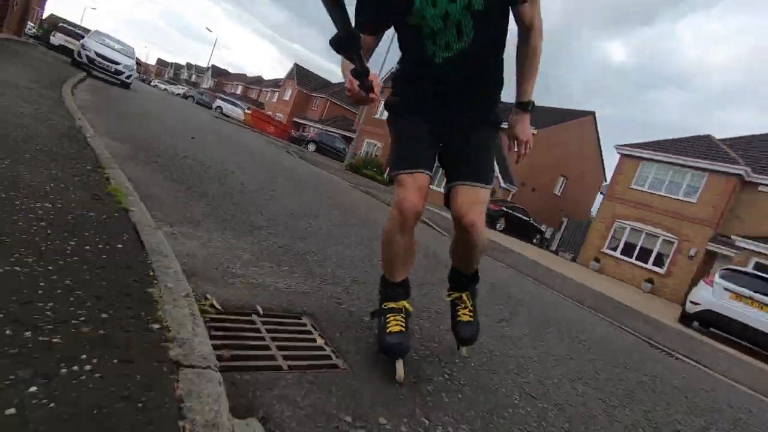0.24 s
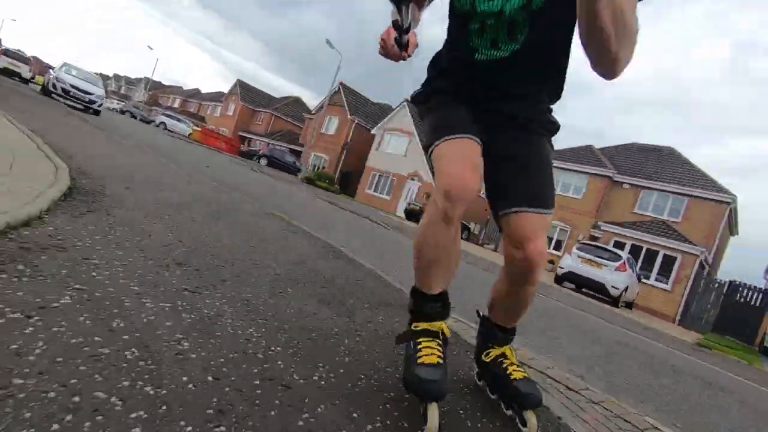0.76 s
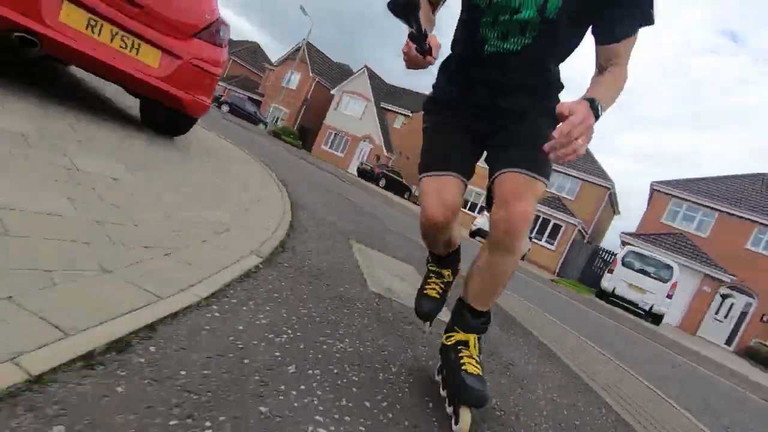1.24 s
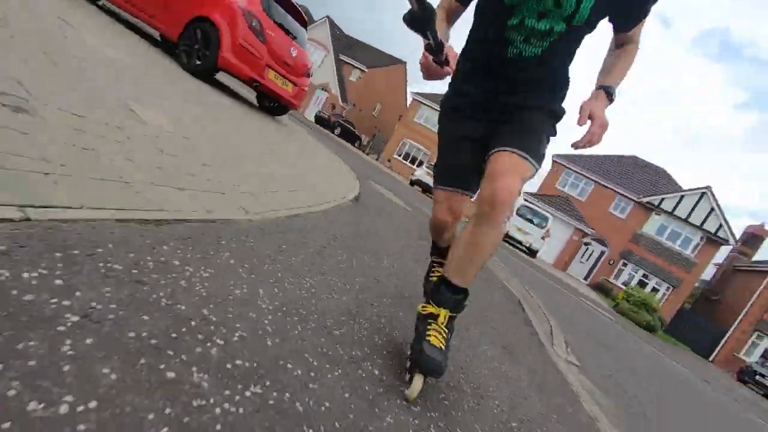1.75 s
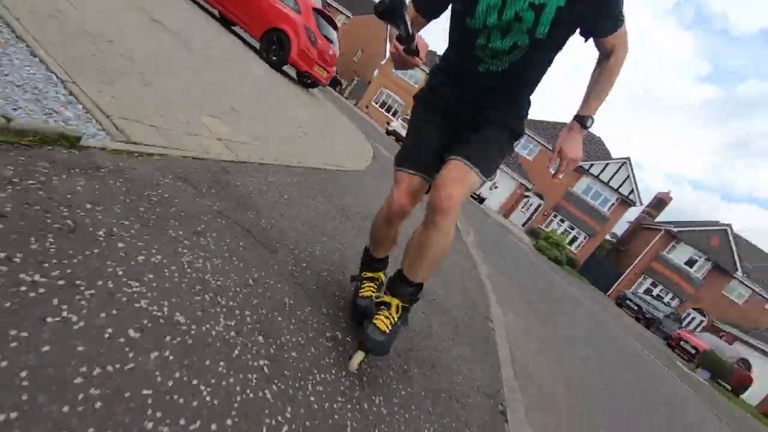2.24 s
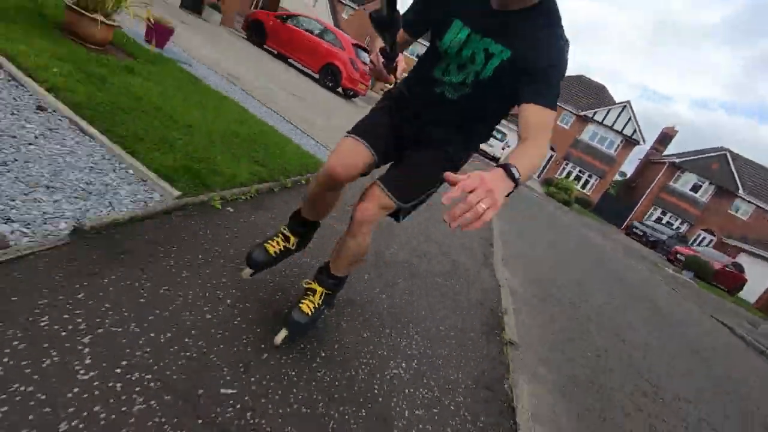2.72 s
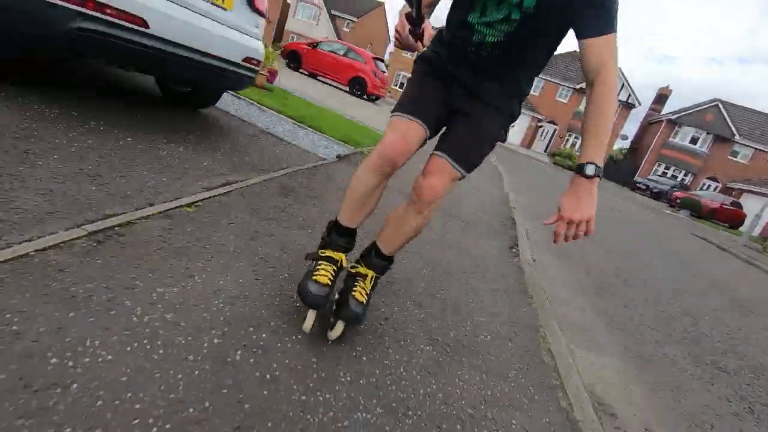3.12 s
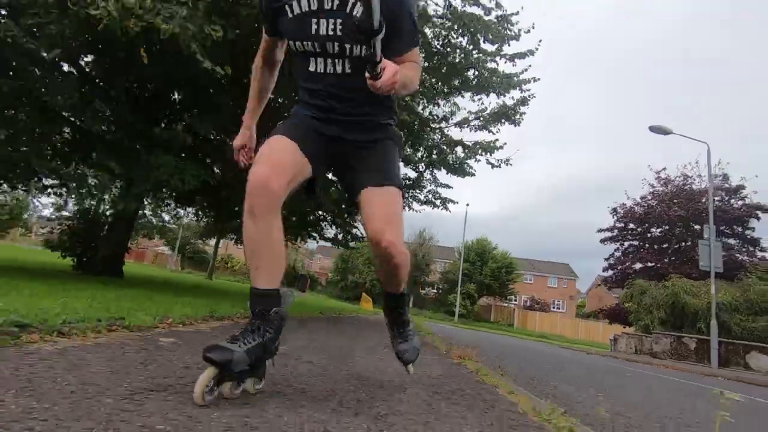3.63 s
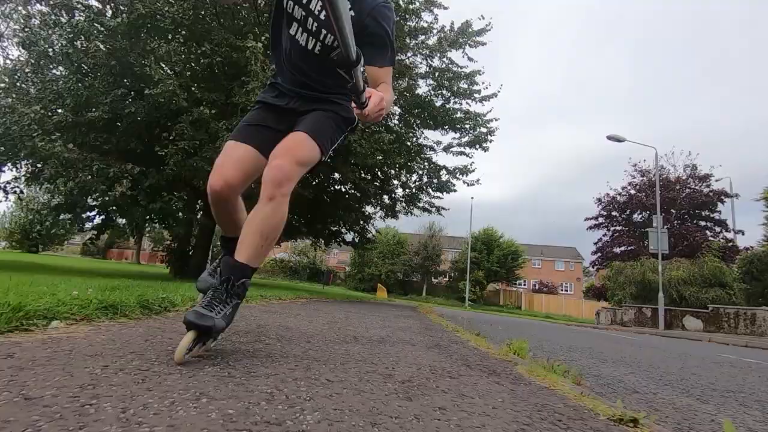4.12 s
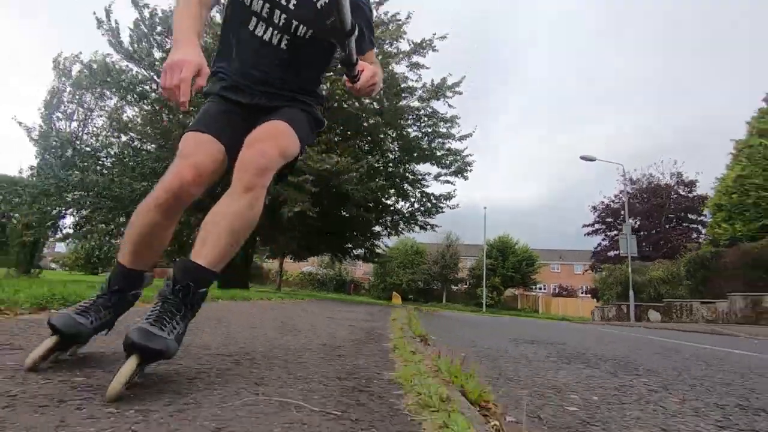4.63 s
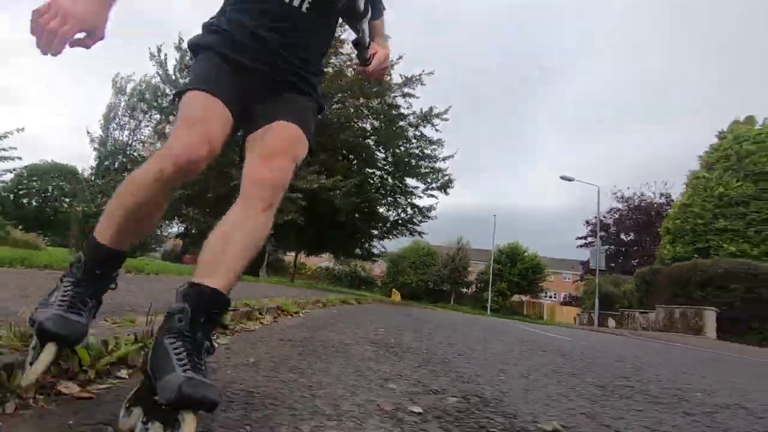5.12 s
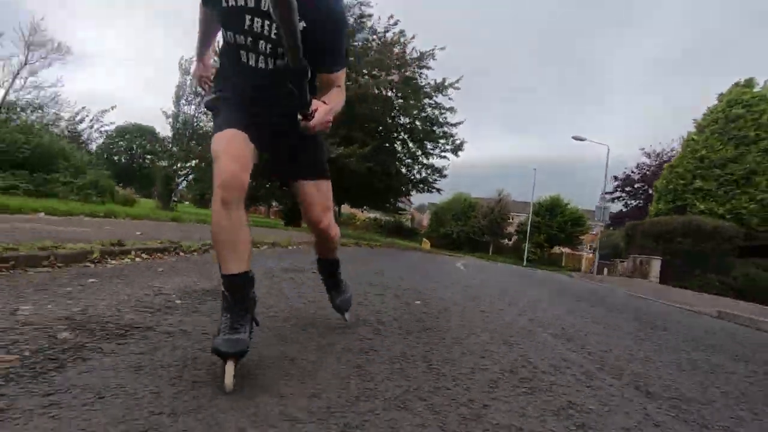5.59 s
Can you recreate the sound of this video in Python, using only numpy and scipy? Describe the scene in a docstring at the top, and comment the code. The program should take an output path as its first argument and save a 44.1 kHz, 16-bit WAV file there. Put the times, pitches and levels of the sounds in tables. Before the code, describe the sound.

Inline skates roll over rough asphalt with a gritty roar and sharp knocks, while wind buffets the microphone.

```python
"""Inline skates roll over two stretches of rough asphalt, heard from a small camera held low on a pole.
Stones under the wheels give a gritty roar that comes in swells and rings in wheels and frames.
The wheels knock on cracks and landings, and the road reflects their sound up to the camera.
Right at the microphone, wind buffets the port and bursts into short puffs; jolts rumble up the pole."""
import sys
import numpy as np
from scipy import signal
from scipy.fft import rfft, irfft
from scipy.io import wavfile

SR = 44100
rng = np.random.default_rng(int(sys.argv[2]) if len(sys.argv) > 2 else 0)


def pcm_store(signal):
    """Save signal as 16-bit PCM."""
    levels = np.round(np.clip(np.atleast_2d(signal), -1, 1) * 32767)
    wavfile.write(sys.argv[1], SR, levels.astype(np.int16).T)


N = 258426
TIME_S = np.arange(N) / SR
CUT_S = 3.335   # the sound cuts abruptly from one stretch to the next


def from_db(db):
    """Decibels to gain."""
    return 10 ** (np.asarray(db) / 20)


def power_sum(levels_db):
    """Combined level in dB of unrelated sounds."""
    return 10 * np.log10(sum(10 ** (np.maximum(db, -150) / 10) for db in levels_db))


def rms_one(x):
    """Scale to rms 1."""
    return x / np.sqrt(np.mean(x ** 2) + 1e-20)


def rms_one_under(x, swell):
    """Scale to rms 1 under the swell."""
    return x * np.linalg.norm(swell) / np.linalg.norm(x * swell)


def curves(rows):
    """One curve for each column after the time, joined by straight lines."""
    times, *columns = np.transpose(rows)
    return [np.interp(TIME_S, times, column) for column in columns]


def drift(rate_hz):
    """Random wander of rms 1, smoothed above rate_hz."""
    r = np.exp(-2 * np.pi * rate_hz / SR)
    return rms_one(signal.lfilter([1], [1, -2 * r, r * r], rng.standard_normal(N + SR))[SR:])


def band(x, low_hz, high_hz, order=3):
    """Butterworth band-pass."""
    return signal.sosfilt(signal.butter(order, [low_hz, high_hz], "band", fs=SR, output="sos"), x)


def split(x, hz):
    """The parts below and above hz."""
    return [signal.sosfilt(signal.butter(4, hz, side, fs=SR, output="sos"), x)
            for side in ("low", "high")]


def colour(x, spectrum, size=8192):
    """Minimum-phase filter with a spectrum of (frequency_hz, level_db) points."""
    hz, db = np.transpose(spectrum)
    grid_hz = np.maximum(np.arange(size // 2 + 1) * SR / size, 1)
    cepstrum = irfft(np.interp(np.log(grid_hz), np.log(hz), db) * np.log(10) / 20)
    cepstrum[1:size // 2] *= 2
    cepstrum[size // 2 + 1:] = 0
    return signal.fftconvolve(x, irfft(np.exp(rfft(cepstrum))))[:len(x)]


def resonance(hz, width_hz):
    """Coefficients of a two-pole resonance with peak gain 1."""
    r = np.exp(-np.pi * width_hz / SR)
    return (1 - r * r) / 2 * np.array([1, 0, -1]), [1, -2 * r * np.cos(2 * np.pi * hz / SR), r * r]


def glide(x, pitch_hz, width_hz, size=256):
    """A resonance that follows a pitch curve in short blocks."""
    out, state = np.zeros(N), np.zeros(2)
    for i in range(0, N, size):
        tuning = resonance(pitch_hz[i], width_hz)
        out[i:i + size], state = signal.lfilter(*tuning, x[i:i + size], zi=state)
    return out


# Spectrum of the wind on the microphone port: frequency_hz, level_db
BUFFET_SPECTRUM = [(13, -25), (22, 5.5), (48, 1.5), (96, 2), (146, -1), (174, -9.5), (300, -30.5),
                   (390, -61.5), (660, -120)]
# Gusts at the port, 9 dB down a half length from the peak: peak_s, level_db, half_length_s
GUSTS = [(0.0, -21, 0.079), (0.374, -19, 0.019), (0.783, -35, 0.04), (0.92, -19.5, 0.016),
         (1.098, -18, 0.041), (1.7, -21.5, 0.058), (1.932, -22, 0.037), (2.212, -24, 0.018),
         (2.289, -17, 0.03), (2.518, -35, 0.0077), (2.669, -24, 0.092), (2.836, -24.5, 0.029),
         (2.978, -15.5, 0.072), (3.238, -20.5, 0.056), (3.374, -22.5, 0.049), (3.507, -19.5, 0.021),
         (3.649, -22, 0.017), (3.82, -17, 0.021), (4.047, -11.5, 0.01), (4.116, -28.5, 0.059),
         (4.236, -17.5, 0.03), (4.4, -29, 0.058), (4.517, -25.5, 0.13), (5.335, -34, 0.048),
         (5.5, -19.5, 0.077)]
# The deepest buffet against the rest: time_s, gain_db
DEEP_BUFFET = [(0.0, -4), (0.3, -0.5), (0.9, -12), (1.5, 1.5), (2.0, 1), (2.28, -6), (2.6, 5.5),
               (3.0, -3.5), (3.6, -1.5), (4.2, 4.5), (4.8, -8), (5.3, 0.5), (5.86, -3)]

def buffet(steady_db, lumps, deep_gust_share=0.18):
    """Eddies and gusts press on the port; the deepest part follows the gusts only a little."""
    gusts_db = [db - 9 * ((TIME_S - peak_s) / half_s) ** 2 for peak_s, db, half_s in GUSTS]
    level_db = power_sum([steady_db] + gusts_db)
    deep, upper = split(rms_one(colour(rng.standard_normal(N), BUFFET_SPECTRUM)), hz=55.6)
    deep_db = curves(DEEP_BUFFET)[0] - (1 - deep_gust_share) * (level_db - steady_db) + 2.5 * drift(2.8)
    return from_db(level_db) * (upper * from_db(2.5 * lumps) + deep * from_db(deep_db))


# Jolts that reach the camera through the pole: peak_s, level_db
JOLTS = [(0.634, -19.5), (0.665, -25), (0.85, -38), (1.083, -20.5), (1.433, -28.5), (1.73, -32),
         (1.929, -26.5), (2.147, -24), (2.29, -24), (2.905, -13), (3.277, -23), (3.33, -24), (3.592, -31),
         (3.948, -23), (4.02, -38), (5.05, -17), (5.085, -16.5), (5.135, -18), (5.164, -12.5), (5.2, -20),
         (5.28, -17.5), (5.37, -21)]

def pole_rumble(steady_db, lumps, band_hz=(114.7, 308), rise_db_per_s=505, fall_db_per_s=415):
    """Wind and jolts make a low rumble that rings in the pole."""
    jolts_db = [db - np.maximum(rise_db_per_s * (peak_s - TIME_S), fall_db_per_s * (TIME_S - peak_s))
                for peak_s, db in JOLTS]
    shake = band(rng.standard_normal(N), *band_hz, order=2)
    pole = signal.lfilter(*resonance(hz=179.6, width_hz=62), shake)
    rumble = rms_one(band(rng.standard_normal(N), *band_hz)) + rms_one(pole)
    return from_db(power_sum([steady_db] + jolts_db)) * rms_one(rumble * from_db(2 * lumps))


# Steady wind at the microphone: time_s, buffet_db, rumble_db, flutter_db
WIND_LEVELS = [(0.0, -18, -25.5, -30.5), (0.35, -29.5, -32, -46.5), (0.47, -30.5, -41, -47.5),
               (0.575, -44.5, -66, -71), (0.66, -25, -27, -46.5), (0.93, -29, -30.5, -38.5),
               (1.2, -35, -37.5, -51.5), (1.5, -31.5, -40, -41.5), (1.82, -32, -40, -52.5),
               (2.09, -30, -41, -44.5), (2.53, -32, -43, -54), (2.7, -35.5, -37.5, -45),
               (2.87, -24, -34, -52.5), (2.94, -21.5, -27.5, -38), (3.03, -26, -28, -44),
               (3.09, -26, -26, -27), (3.15, -27, -28, -27.5), (3.23, -26, -30, -35.5),
               (3.33, -23.5, -35, -44.5), (3.57, -32.5, -41.5, -51.5), (3.7, -30, -36, -48.5),
               (3.95, -32, -28.5, -33.5), (4.1, -32.5, -39, -40.5), (4.35, -34.5, -34, -45),
               (4.77, -30.5, -34, -42.5), (4.9, -32.5, -31, -35.5), (5.0, -31.5, -22, -30.5),
               (5.11, -34, -27, -29.5), (5.17, -34, -25, -28), (5.25, -28, -32, -38),
               (5.33, -27.5, -29, -40), (5.46, -30, -28, -31), (5.68, -31.5, -32, -38),
               (5.86, -31.5, -38.5, -44)]

def wind(flutter_hz=(289, 712)):
    """Eddies pass the port in lumps that move buffet, rumble and a weak flutter together."""
    buffet_db, rumble_db, flutter_db = curves(WIND_LEVELS)
    lumps = 2 * np.tanh(drift(25.5) / 2)   # no single eddy towers over the rest
    low_wind = buffet(buffet_db, lumps) + pole_rumble(rumble_db, lumps)
    flutter = band(rng.standard_normal(N), *flutter_hz) * from_db(3 * lumps)
    return low_wind + from_db(flutter_db) * rms_one(flutter)


# Puffs right on the port: start_s, level_db, half_length_s, edge_gain_db, pitch_hz, edge_top_hz
PUFFS = [(0.624, -22, 0.0092, -8, 250, 1520), (0.849, -19, 0.01, -9, 300, 1500),
         (1.081, -30, 0.032, -2, 300, 1520), (1.936, -21.5, 0.0068, 1.5, 358, 1020),
         (2.889, -10, 0.015, -27, 306, 2290), (2.914, -12, 0.006, -23, 346, 2390),
         (2.948, -26, 0.027, -16, 300, 1900), (2.963, -28, 0.005, -1, 400, 3290),
         (2.987, -13.5, 0.016, -15, 350, 1350), (3.038, -29, 0.0061, -31, 395, 900),
         (3.062, -9, 0.013, -15, 364, 1600), (3.077, -21, 0.0074, -14, 400, 3000),
         (3.099, -22.5, 0.018, 3, 443, 1290), (3.126, -21.5, 0.011, -3, 450, 1912),
         (3.146, -38, 0.027, -17, 490, 900), (3.199, -20.5, 0.016, -9, 397, 1480),
         (3.235, -17.5, 0.02, -5.5, 300, 1040), (3.251, -32, 0.016, 8, 300, 2140),
         (3.27, -34, 0.0067, 8.5, 300, 1700), (3.801, -20, 0.015, -25, 250, 920),
         (3.82, -17.5, 0.014, -17, 397, 1200), (3.892, -14, 0.0073, -5, 393, 1300),
         (3.912, -15, 0.0068, -19, 396, 1200), (3.918, -21, 0.0085, -18, 543, 1200),
         (3.931, -17, 0.015, -25, 250, 900), (3.949, -23, 0.11, -4, 347, 1210),
         (4.034, -18, 0.0083, -25, 348, 890)]

def wind_puffs(gain_db=-7, pitch_spread=1.5, edge_from_hz=600, edge_thins_hz=1400):
    """A puff swells and fades quickly and unevenly; its bright edge shows only at the crest."""
    out, size = np.zeros(N), SR // 10
    for start_s, db, half_s, edge_db, hz, top_hz in PUFFS:
        air = rng.standard_normal(2 * size)
        swell = np.sin(np.pi * np.minimum(np.arange(size) / SR / (2 * half_s), 1)) ** 2
        body = band(air, hz / pitch_spread, hz * pitch_spread, order=1)
        body = rms_one_under(split(body, top_hz)[0][size:], swell)
        edge = band(air, 300, edge_thins_hz, order=1)
        edge = rms_one_under(band(edge, edge_from_hz, top_hz, order=2)[size:], swell ** 2)
        i = round(start_s * SR)
        out[i:i + size] += from_db(db + gain_db) * swell * (body + from_db(edge_db) * swell * edge)
    return split(out * from_db(2.5 * drift(85)), hz=3000)[0]


# Brief pitched rings in the roll and the wind: start_s, level_db, pitch_hz, length_s
RINGS = [(1.855, -39.5, 840, 0.015), (2.138, -29, 900, 0.012), (2.329, -42.5, 1330, 0.019),
         (2.448, -44, 2260, 0.056), (3.26, -32, 866, 0.02), (3.267, -36.5, 1570, 0.021),
         (3.283, -38, 1330, 0.014), (3.284, -50, 2330, 0.016), (3.649, -38, 2560, 0.041),
         (3.685, -37, 2190, 0.02), (3.971, -34, 1150, 0.029), (4.026, -27.5, 392, 0.035),
         (4.039, -33, 3070, 0.017)]

def brief_rings(width_hz=150):
    """Noise swells for a moment in one narrow resonance."""
    out, size = np.zeros(N), SR // 10
    for start_s, db, hz, length_s in RINGS:
        swell = np.sin(np.pi * np.minimum(np.arange(size) / SR / length_s, 1))
        narrow = resonance(hz, width_hz)
        ring = signal.lfilter(*narrow, signal.lfilter(*narrow, rng.standard_normal(2 * size)))
        i = round(start_s * SR)
        out[i:i + size] += from_db(db) * swell * rms_one_under(ring[size:], swell)
    return out


# Delay of the bounce off the road just below the microphone: time_s, lag_ms
GROUND_LAG = [(0.0, 1.4), (0.6, 1.24), (0.9, 0.78), (1.2, 0.68), (1.6, 1.18), (2.0, 0.88), (2.5, 0.73),
              (3.0, 0.93), (3.5, 0.66), (3.85, 1.3), (4.3, 0.73), (4.9, 1.06), (5.2, 1.2), (5.55, 0.96),
              (5.86, 0.76)]

def with_road_reflection(direct, reflection_db=-19.5):
    """The road reflects the wheels; the lag slides as skates and pole swing."""
    lag_s = curves(GROUND_LAG)[0] / 1000
    return direct + from_db(reflection_db) * np.interp(TIME_S - lag_s, TIME_S, direct)


def on_road(x, *spectra):
    """Wheel sound takes the colour of each stretch, at unit power gain; it switches at the cut."""
    pulse = np.eye(1, 4096)[0]
    first, second = (colour(x, s) / np.linalg.norm(colour(pulse, s)) for s in spectra)
    return np.where(TIME_S < CUT_S, first, second)


# Wheel tread on each stretch of asphalt: frequency_hz, level_db
FIRST_TREAD = [(820, -44), (1400, 7), (1670, 6), (2280, 2), (2860, 1), (3520, -1.5), (4400, -6.5),
               (4880, -8), (5250, -13.5), (5600, -18), (7280, -76.5), (12300, -120)]
SECOND_TREAD = [(820, -57.5), (1350, 1), (1520, 1), (1810, 5.5), (2050, 3), (2760, -1), (3380, -6),
                (3860, -8), (4800, -13.5), (5600, -25.5), (7280, -88), (12300, -120)]

def tread_tone(x):
    """The midrange colour of wheels on asphalt."""
    return on_road(x, FIRST_TREAD, SECOND_TREAD)


# Fine grit on each stretch, heard through the microphone port: frequency_hz, level_db
FIRST_GRIT = [(4500, -12), (5600, -1.5), (6300, -3), (7200, 0.5), (8300, -5), (9100, -17.5), (9700, -16),
              (10500, -12), (11500, -18.5), (13000, -24), (15500, -22)]
SECOND_GRIT = [(4500, -8), (5600, 0), (6300, -2), (7200, 2.5), (8300, -5.5), (9100, -16.5), (10000, -21),
               (10400, -21), (10850, -18), (11400, -25), (13000, -28), (15500, -58)]

def grit_tone(x):
    """The treble colour of grit, shaped by the port."""
    return on_road(x, FIRST_GRIT, SECOND_GRIT)


# Resonances of the skate boot: pitch_hz, width_hz, gain_db
BOOT_MODES = [(285, 91, 3), (630, 107, -3), (836, 27, -4), (1200, 67, -25)]

def boot_thud(thud, ring_db=13, thud_db=10, thud_hz=(196, 1590)):
    """A low thud and the ring it sets off in the boot."""
    ring = sum(from_db(db) * signal.lfilter(*resonance(hz, width_hz), thud)
               for hz, width_hz, db in BOOT_MODES)
    return from_db(ring_db) * split(ring, hz=1780)[0] + from_db(thud_db) * band(thud, *thud_hz)


# Cracks and stones in the road: start_s, level_db, thud_gain_db, tick_gain_db
CRACKS = [(0.119, -22, -14, -30), (0.16, -17, -2.5, -18), (0.204, -24.5, -8, -24), (0.243, -31, -12, -22),
          (0.3585, -19.5, -12, -24), (0.434, -26.5, -3, -24), (0.453, -26, -5, -23), (0.411, -25, -8, -23),
          (0.53, -36, 3.5, -28), (0.616, -31, -12, -15), (0.662, -20.5, -24, -25), (0.94, -22, -5, -22),
          (0.958, -21, -8, -24), (1.009, -27.5, 3, -21), (1.092, -24.5, 6, -28), (1.132, -21, -11, -21),
          (1.146, -19.5, 2, -22), (1.1701, -21.5, -5, -22), (1.1857, -26.5, -3, -28), (1.26, -22, -4, -22),
          (1.289, -29, -3, -30), (1.317, -29, -2, -18), (1.377, -37, -8, -20), (1.55, -22.5, 0, -20),
          (1.6292, -24.5, 8.5, -15), (1.698, -26.5, -8, -16), (1.726, -27.5, -4, -18),
          (1.824, -21.5, -22, -20), (1.8962, -23, -6, -12.5), (2.341, -21, -6, -27),
          (2.3735, -15.5, -16, -28), (2.4, -24.5, -3, -20), (2.451, -17.5, -8, -23),
          (2.538, -21.5, -10, -24), (3.426, -17, -1, -16), (3.555, -23, 2, -21), (3.625, -19, 6, -30),
          (4.0496, -14, -3, -28), (4.6195, -15.5, -14, -32), (4.675, -18, -12, -23), (4.861, -19, -14, -26),
          (5.09, -15, -8, -12), (5.112, -22, -10, -15), (5.205, -17, 4, -13), (5.231, -16, -11, -20),
          (5.38, -13, -2, -23), (5.508, -15, -10, -22), (5.745, -22, 7, -29), (5.7981, -18, 1, -38)]
# Front wheels landing on the road: start_s, level_db, thud_gain_db, tick_gain_db
LANDINGS = [(1.8558, -19.5, -1, -19.5), (2.14, -16.5, -3.5, -19.5), (3.5877, -16, -2, -21),
            (4.004, -11, -1, -19.5), (5.275, -14.5, 4.5, -17), (5.3633, -18.5, 8.5, -14.5),
            (5.4505, -19, 11.5, -7)]

def wheel_knocks(gain_db=-9, rise_s=0.0004, crack_t60_s=0.016, landing_t60_s=0.043):
    """A knock is a hard click and a dying rattle of the wheels, with a low thud and a bright tick."""
    rear_lag_s, rear_db = 0.008, -8.5
    rear = [(start_s + rear_lag_s, db + rear_db, *tone) for start_s, db, *tone in LANDINGS]
    envelopes, t = np.zeros((4, N)), np.arange(SR // 5) / SR
    rattle = rng.standard_normal(N)
    # Landings shake the whole wheel, small stones only its rim.
    for rows, t60_s, click, wheel_gain, rim_gain in [(CRACKS, crack_t60_s, 8.0, 0, 1),
                                                     (LANDINGS + rear, landing_t60_s, 4.2, 1, 0)]:
        for start_s, db, thud_db, tick_db in rows:
            i = round(start_s * SR)
            dying = np.minimum(t / rise_s, 1) * from_db(db + gain_db - 60 * t / t60_s)
            gains = [wheel_gain, from_db(thud_db), from_db(tick_db), rim_gain]
            envelopes[:, i:i + len(t)] += np.outer(gains, dying)[:, :N - i]
            rattle[i + 12] = click
    wheel, thud, tick, rim = envelopes * rattle
    rim_snap = split(rim, hz=1850)[1]
    rim_ring = from_db(1.8) * signal.lfilter(*resonance(hz=2720, width_hz=1230), rim)
    return tread_tone(wheel + rim_snap + rim_ring) + grit_tone(tick) + boot_thud(thud)


def stones(patches, hits_per_s=2500, spread_db=3, hiss_share=0.44):
    """Wheels hit stones of uneven size at random, over a fine hiss; road patches scale both."""
    sizes = from_db(spread_db * np.minimum(rng.exponential(1, N), 5)) * rng.choice([-1, 1], N)
    hits = rms_one(sizes * (rng.random(N) < hits_per_s / SR))
    return patches * (np.sqrt(1 - hiss_share) * hits + np.sqrt(hiss_share) * rng.standard_normal(N))


# The highest grit against the rest: time_s, gain_db
GRIT_TOP = [(0.0, 5), (0.15, 2), (0.4, -1), (0.9, 0.5), (1.2, -0.5), (1.55, -0.5), (1.8, -1), (2.08, 2),
            (2.3, -2), (3.0, -2), (3.4, 0), (3.8, 0.1), (4.2, -1), (4.8, -0.5), (5.0, 1), (5.12, 3),
            (5.25, 2), (5.33, -2), (5.5, 0.5), (5.86, 0)]

def fine_grit(patches, level_db, top_follows=0.24, even_db=-63):
    """Fine grit hisses under the wheels, brighter as it gets louder."""
    lower, top = split(grit_tone(stones(patches)), hz=9300)
    return lower + top * from_db(top_follows * (level_db - even_db) + curves(GRIT_TOP)[0])


# Ring of the skate frame under load, against its rattle: time_s, pitch_hz, gain_db
FRAME_RING = [(0, 930, -21.5), (3.3, 980, -23), (3.4, 960, -7), (3.7, 1146, -5.5), (4.0, 1110, -7.5),
              (4.15, 1046, -6), (4.4, 1000, -4.5), (4.75, 1017, -6), (4.95, 1110, -6), (5.1, 950, -9.5),
              (5.3, 1140, -6.5), (5.4, 1000, -12.5), (5.55, 920, -9.5), (5.86, 1026, -11.5)]

def frame_rattle(road, patches, band_hz=(752, 1330)):
    """Stones rattle the frame, which rings at a pitch that moves with load."""
    pitch_hz, ring_db = curves(FRAME_RING)
    ring = rms_one(glide(stones(patches), pitch_hz, width_hz=210))
    return band(road + from_db(ring_db) * ring, *band_hz)


# Whirr of the wheels, against the roar: time_s, pitch_hz, gain_db
WHIRR = [(0.0, 2320, -6), (0.3, 2240, -12), (0.55, 2300, 1), (0.75, 2170, -9), (0.9, 1830, -6),
         (1.2, 2320, -7), (1.45, 2270, -2), (1.65, 2110, -8), (1.85, 2360, -4), (2.1, 2230, -0.5),
         (2.3, 2630, -20), (2.45, 2260, -7), (2.62, 1790, 0.5), (2.8, 2240, -10), (3.1, 2000, -14),
         (3.36, 2750, -13), (3.55, 2400, -1), (3.68, 2570, -2), (3.85, 3020, -8), (4.0, 2800, -6),
         (4.22, 2130, -3.5), (4.45, 2000, -3.5), (4.68, 2470, -8), (4.85, 1650, -1.5), (5.05, 1790, -5),
         (5.3, 1810, -5), (5.42, 2430, -2), (5.6, 2770, -8), (5.86, 2910, -16)]

def wheel_whirr(patches, band_hz=(970, 3350)):
    """The wheels whirr at a pitch that moves with load and lean; returns sound and gain in dB."""
    pitch_hz, gain_db = curves(WHIRR)
    return band(glide(stones(patches), pitch_hz, width_hz=240), *band_hz), gain_db


# Swells of the rolling roar, each with a start, middle and end level:
# start_s, middle_s, end_s, start_db, middle_db, end_db
ROAR_SWELLS = [(0.0, 0.098, 0.35, -40, -37, -45), (0.619, 0.953, 1.093, -44.5, -39, -45.5),
               (1.26, 1.56, 1.776, -51, -38.5, -51.5), (1.894, 2.077, 2.13, -45.5, -41, -42.5),
               (2.182, 2.31, 2.4, -48, -47.5, -48.5), (2.448, 2.715, 2.82, -48, -46, -47),
               (2.868, 3.157, 3.57, -46.5, -51, -50), (3.36, 3.475, 3.43, -49.5, -48, -49),
               (3.593, 3.768, 4.1, -40.5, -38.5, -41), (4.015, 4.248, 4.21, -43.5, -37.5, -40),
               (4.32, 4.472, 4.53, -45.5, -35, -36.5), (4.548, 4.683, 4.9, -39.5, -37, -41.5),
               (4.753, 4.84, 4.9, -41.5, -36.5, -37), (4.933, 5.048, 5.11, -37.5, -28, -32.5),
               (5.146, 5.2, 5.24, -38, -39, -42.5), (5.29, 5.385, 6.1, -42.5, -39.5, -30),
               (5.453, 5.5, 5.6, -36.5, -32.5, -47.5), (5.71, 5.754, 3.9, -57, -42, -56.5)]

def roar_swells(rise_db_per_s=904, fall_db_per_s=97, floor_db=-64.5, pulse_width_s=0.0056):
    """The roar comes in overlapping swells; returns its level in dB and a pulse at each middle."""
    levels_db, pulses = [floor_db], np.zeros(N)
    for start_s, middle_s, end_s, start_db, middle_db, end_db in ROAR_SWELLS:
        end_s = max(end_s, middle_s + 0.001)   # an end set too early falls just after the middle
        corners_s = [start_s - 1, start_s, middle_s, end_s, end_s + 1]
        corners_db = [start_db - rise_db_per_s, start_db, middle_db, end_db, end_db - fall_db_per_s]
        levels_db.append(np.interp(TIME_S, corners_s, corners_db))
        pulses += np.exp(-((TIME_S - middle_s) / pulse_width_s) ** 2)
    return power_sum(levels_db), pulses


# The roll as heard from the pole, against the roar: time_s, sizzle_db, frame_db, grit_db
ROLL_BALANCE = [(0.0, -27, 2, -18), (0.13, -8, 1.5, -17), (0.18, -28, -0.5, -22.5), (0.4, -3.5, 6, -16),
                (0.58, -2, 5, -17.5), (0.7, -17, -1.5, -22), (0.88, -12, 3.5, -18.5),
                (0.95, -6, 3.5, -13.5), (1.0, -18, -1.5, -20.5), (1.2, -6, 7.5, -17), (1.4, -10, -2.5, -18),
                (1.56, -16, -3, -18), (1.63, -15, -2, -25), (1.74, -1.5, 3, -13), (1.88, -7.5, 1.5, -17),
                (2.1, -6.5, -5, -15), (2.2, -17, -3, -22), (2.32, -3, 1, -15), (2.5, -17.5, -2.5, -24),
                (2.75, -11.5, 0, -20.5), (2.95, -8.5, 5, -19.5), (3.3, -4.5, 6, -11), (3.36, 1.5, -1, -7.5),
                (3.57, 2, -6, -10.5), (3.62, -9, -7, -13.5), (3.9, -14, -3.5, -20.5), (4.05, -7, -2, -16.5),
                (4.3, -8, -3, -14), (4.5, -9, -6, -17.5), (4.9, -5.5, 1, -15.5), (4.98, -6, 5.5, -15.5),
                (5.05, -9, -0.5, -18), (5.12, -6.5, -4.5, -16.5), (5.17, -1.5, 4, -16.5),
                (5.22, 3.5, -1.5, -12), (5.38, -16, 1, -16), (5.48, -11, 3, -13), (5.65, -21, -0.5, -19.5),
                (5.86, -13.5, -4, -19)]

def rolling_skates(joint_s=5.06, joint_half_s=0.086, crunch_hz=(487, 910), waver_db=1.5):
    """Stones drive tread, frame, whirr and grit; an overgrown joint is lumpier and crunches."""
    roar_db, pulses = roar_swells()
    sizzle_db, frame_db, grit_db = roar_db + curves(ROLL_BALANCE)
    sizzle_db += 1.5 * pulses   # briefly more sizzle and less grit in the middle of each swell
    grit_db -= 1.5 * pulses
    from_joint = (TIME_S - joint_s) / joint_half_s
    patchy_db = 1 + 0.5 * np.exp(-from_joint ** 2)
    patches = from_db(patchy_db * drift(68))
    road = stones(patches)
    roar, sizzle = split(tread_tone(road), hz=3300)
    grit = fine_grit(patches, grit_db)
    frame = frame_rattle(road, patches)
    whirr, whirr_db = wheel_whirr(patches)
    crunch, crunch_db = band(road, *crunch_hz), -36 - 9 * from_joint ** 2
    layers = [(roar, roar_db), (sizzle, sizzle_db), (whirr, roar_db + whirr_db),
              (frame, frame_db), (grit, grit_db), (crunch, crunch_db)]
    return sum(rms_one(x * from_db(waver_db * drift(14.2))) * from_db(db) for x, db in layers)


def scene():
    """Skates and wind meet at one microphone, low over the road."""
    skates = with_road_reflection(rolling_skates() + wheel_knocks())
    return (skates + wind() + wind_puffs() + brief_rings())[None, :]


def record(dry):
    """Rounded peaks, a low-pass, and a tiny click where the sound cuts from one stretch to the next."""
    ceiling, cutoff_hz = 1.1, 15500
    click = np.zeros(N)
    click[round(CUT_S * SR)] = from_db(-31)
    rounded = ceiling * np.tanh(dry / ceiling)
    return signal.sosfilt(signal.cheby2(12, 70, cutoff_hz, fs=SR, output="sos"), rounded + click)


dry = scene()
out = record(dry)
pcm_store(out)
```